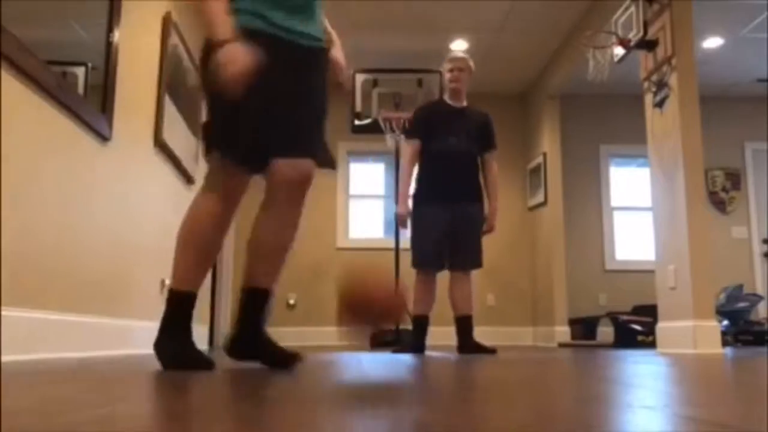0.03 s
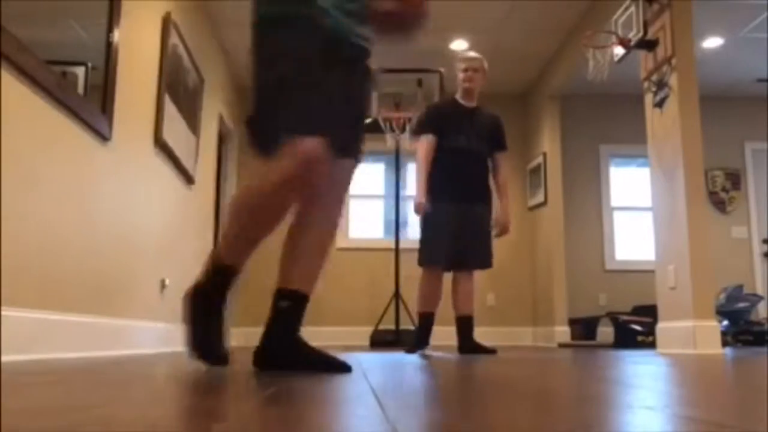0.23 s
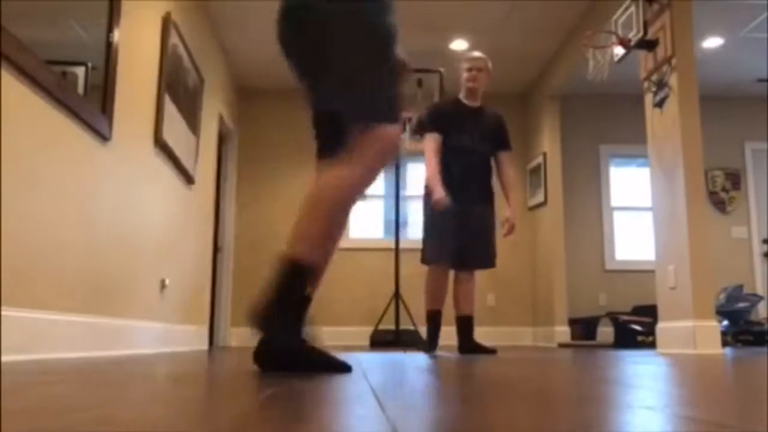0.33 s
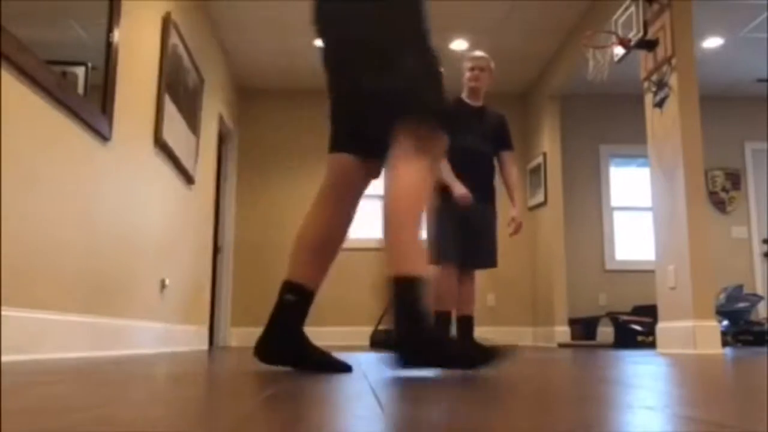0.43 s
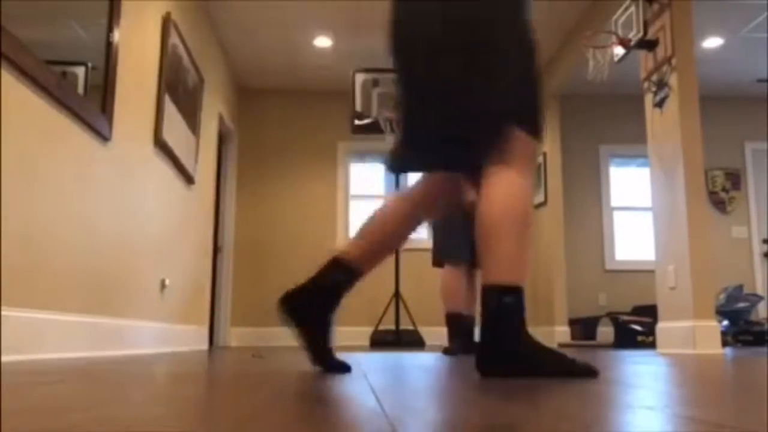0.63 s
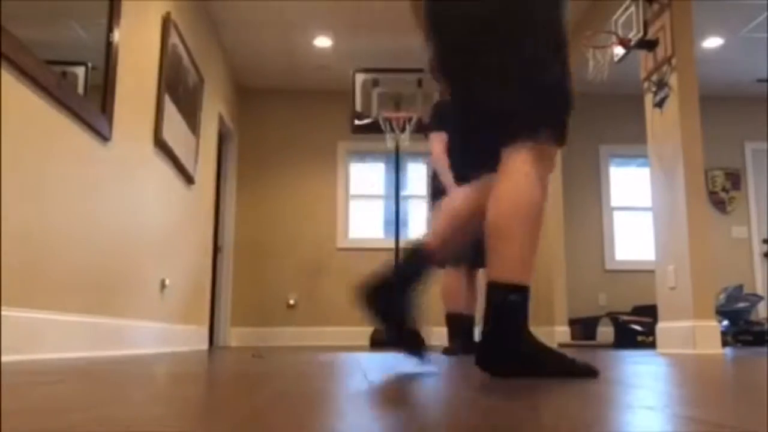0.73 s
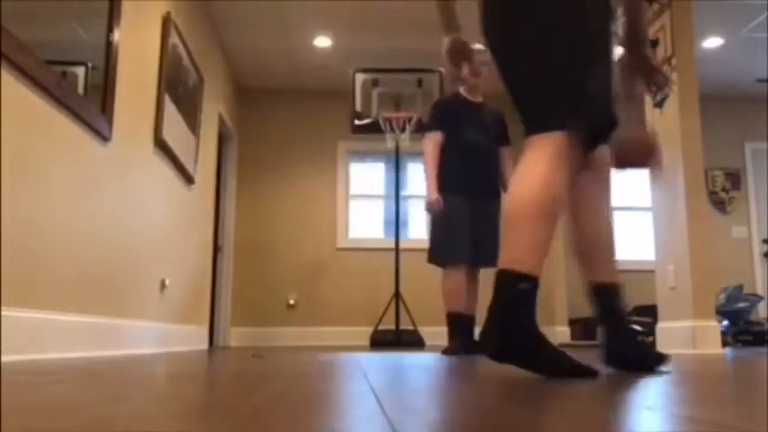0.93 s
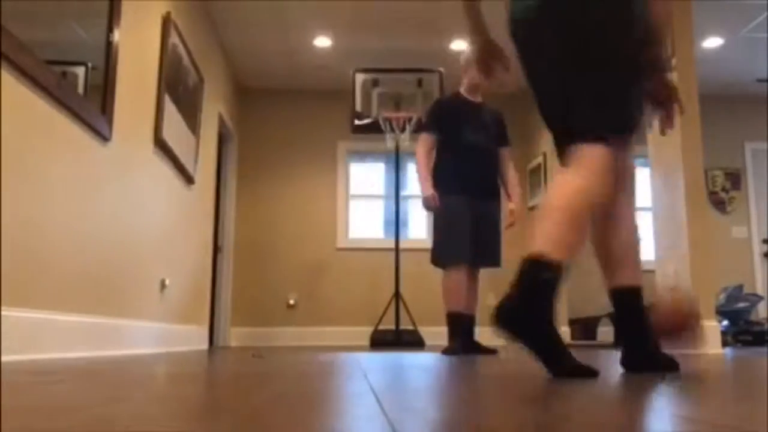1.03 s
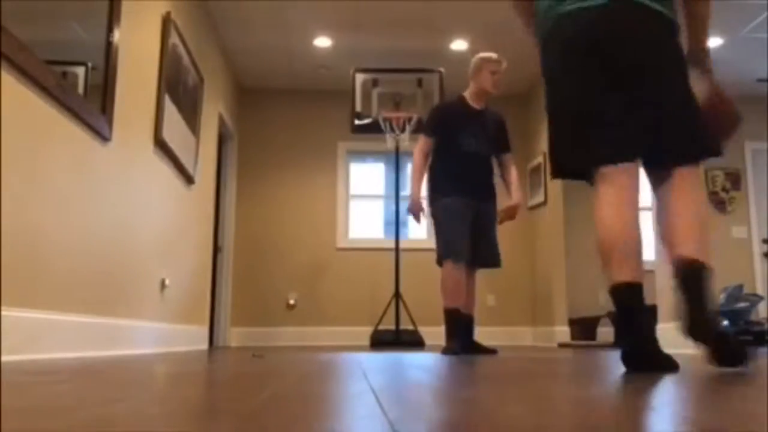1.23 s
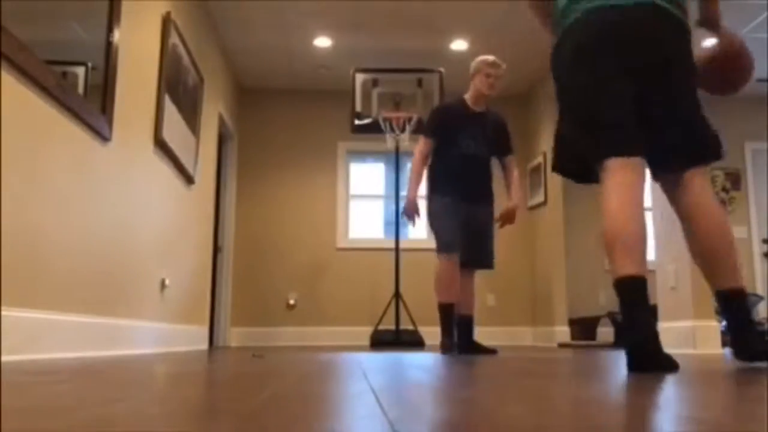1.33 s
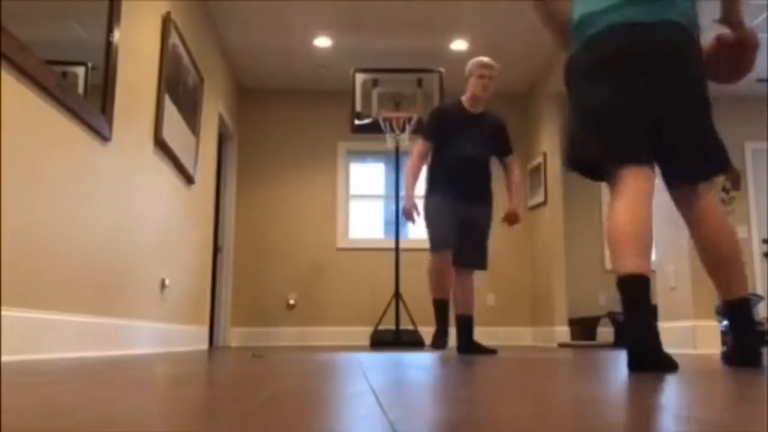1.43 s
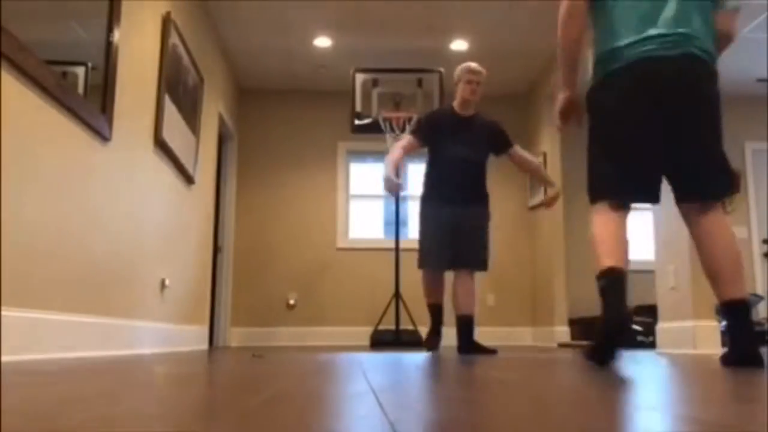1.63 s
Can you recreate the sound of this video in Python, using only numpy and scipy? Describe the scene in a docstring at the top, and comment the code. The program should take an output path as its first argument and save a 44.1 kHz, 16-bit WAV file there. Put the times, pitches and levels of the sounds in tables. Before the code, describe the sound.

A small basketball hits a hardwood floor twice, each a sharp slap with a low boom and hollow ring; soft sock footfalls and a faint hand pat come between, in a bare room, microphone near the floor.

```python
"""Two bounces of a basketball on hardwood

A small basketball is dribbled twice on a hardwood floor in a bare basement room, over a quiet hush.
Each bounce is a swept pulse (slap) with damped sines (boards, air in the ball), answered by echoes,
low bursts and decaying noise. Shaped noise gives hand pats, sock slides, footfalls and a heel tap."""
import sys
import numpy as np
from scipy import signal
from scipy.fft import rfft, irfft, next_fast_len
from scipy.io import wavfile
from scipy.ndimage import map_coordinates

SR = 44100
rng = np.random.default_rng(int(sys.argv[2]) if len(sys.argv) > 2 else 0)


def int16_out(signal):
    """Quantize to a 16-bit WAV file."""
    q = np.round(np.clip(np.atleast_2d(signal).T, -1, 1) * 32767)
    wavfile.write(sys.argv[1], SR, q.astype(np.int16))


N = 74970

# Spectra give relative levels only: noise is scaled to rms 1 and pulses to peak 1.
# Steady hush of the room: [f/Hz, relative level/dB]
HUSH_SPECTRUM = [(25, -22), (70, 2), (160, -2), (400, 2), (1300, -5.5), (3000, -13.5), (8000, -19.5),
                 (15300, -28.5), (16300, -59)]
HUSH_DB = -61.5

# Ringing that is dying away at the start: [f/Hz, level/dB, t60/s]
OLD_RINGING = [(158, -63.5, 0.53), (227, -59, 0.34), (425, -49, 0.17), (1231, -65.5, 0.74)]
WAVER, WAVER_PER_S = 0.54, 15  # final depth of the wavering, random knots per second

# Sock slides: [t/s at the peak, level/dB, Gaussian rise/s, brightness/dB per octave]
SOCK_SLIDES = [(.005, -63, .01, -2), (.055, -70.5, .01, 6), (0.216, -62, 0.024, -0.5),
               (0.758, -58, 0.011, 3), (0.841, -60, 0.03, 1.5), (0.886, -64.5, 0.0082, 4.5),
               (1.147, -51.5, 0.015, -2.5), (1.177, -59.5, 0.026, 2.5), (1.68, -60, 0.019, -3.5)]
# Swish of socks on wood: [f/Hz, relative level/dB]
SOCK_SPECTRUM = [(200, -19), (600, -9), (1150, 6), (2000, 9), (3000, 4.5), (4800, 10), (9000, 2.5),
                 (15300, -3), (16300, -40)]
SOCK_T60_S = 0.24

# Footfalls: [t/s at the peak, level/dB, Gaussian rise/s]
FOOTFALLS = [(.21, -50, 0.028), (.62, -56, 0.025), (.7, -49.5, 0.023), (.757, -46, 0.011),
             (.895, -52, 0.023), (.94, -55, 0.014), (1.68, -56, 0.013)]
# Dull colour of a footfall: [f/Hz, relative level/dB]
FOOTFALL_SPECTRUM = [(25, -17), (70, 0.5), (160, -0.5), (300, -8.5), (600, -20.5), (1500, -24), (4000, -39),
                     (12000, -66)]
FOOTFALL_T60_S = 0.33

# Bounces: [t/s, slap level/dB, slap brightness/dB per octave, boom gain/dB, room gain/dB,
# room brightness/dB per octave, air slope/dB per octave above AIR_HZ]
BOUNCE_EVENTS = [(0.2428, -3, 0.9, -1, -1.5, -0.45, 1), (1.2728, -2.5, -0.04, -2.5, -3, 0.06, -3)]
AIR_HZ = 6000
# Direct slap: [f/Hz, relative level/dB]
SLAP_SPECTRUM = [(100, -23.5), (600, -6), (1100, 2.5), (1800, 5.5), (2800, 1), (4200, 2.5), (7500, -0.5),
                 (10000, -11.5), (15000, -12), (17000, -28.5)]
SLAP_LAG_CYCLES = 1.25  # the contact patch spreads, so the low notes come later

# Each spot of impact wakes the modes differently.
# Floorboards: [f/Hz, t60/s, first-bounce level/dB, second-bounce level/dB], before the boom gain
BOARD_MODES = [(88, 0.27, -14.5, -20.5), (140.04, 0.51, -21, -29.5), (185, 0.41, -21.5, -18),
               (261.7, 0.41, -20.5, -39), (383.3, 0.337, -29, -29.5), (457, 0.481, -30.5, -34.5),
               (599.7, 0.25, -31, -48)]
BOOM_DELAY_S, BOOM_RISE_S = 0.001, 0.012  # the ball squashes before the boards give; time constant
# Air in the ball: [f/Hz, t60/s, first-bounce level/dB, second-bounce level/dB]
BALL_MODES = [(905, .35, -31.5, -49), (1024, 0.24, -30, -67), (1110, 0.26, -32.5, -29),
              (1215, 0.19, -30, -30), (1458, .42, -37.5, -64), (1887, .3, -42, -39.5),
              (2134, .32, -38.5, -44.5), (2880, 0.22, -38, -59.5)]
# High beating pair of the air in the ball: [f/Hz, level/dB, t60/s]
PING_MODES = [(3740, -58, 1.8), (3751, -65, 1.7)]

# Wash of the room: [f/Hz, relative level/dB]
ROOM_SPECTRUM = [(30, -35), (55, -18), (90, -3), (150, -4), (220, -5), (330, -8), (500, -9.5), (760, -20),
                 (1150, -14.5), (1600, -19), (2600, -25), (4000, -24), (6500, -24), (10000, -30.5),
                 (15400, -35.5), (16300, -66)]
# Decay of the wash: [f/Hz, t60/s]
ROOM_DECAY = [(60, 0.46), (170, 0.58), (450, 0.47), (1200, .44), (3000, 0.49), (7000, 0.41), (14000, .27)]
ROOM_DB, ROOM_RISE_S = -20, 0.004  # before each bounce's room gain; time constant
# The ball's many upper modes ripple the colour of the wash.
RIPPLE_DB, RIPPLE_HZ = 2.5, 70.1  # rms of the random knots, knot spacing

# Slap off nearby surfaces: [t/s, level/dB]
SLAP_ECHOES = [(.2453, -25), (.2498, -26), (0.2558, -19), (.2757, -20.5), (0.2773, -32), (1.2763, -2.5),
               (1.2847, -16.5)]
# Colour of those echoes: [f/Hz, relative level/dB]
ECHO_SPECTRUM = [(200, -11), (1200, -12), (2600, -8.5), (4200, 8.5), (7500, -2), (10000, -13.5),
                 (15000, -18.5), (16500, -41)]
SCATTER_DB, SCATTER_T60_S = -23, 0.024  # spray of sound behind each echo, relative to the echo

# Low bursts just after each bounce, the knock of the slap and the boom off the walls:
# [t/s at the peak, level/dB, f/Hz, Gaussian half length/s]
LOW_BURSTS = [(.246, -17.5, 343, 0.0019), (0.2557, -8.5, 130, .0035), (.2545, -21, 588, 0.0026),
              (.262, -17, 86.4, 0.0091), (.298, -11, 139.3, 0.0082), (1.2855, -18, 160, 0.0042),
              (1.295, -13.5, 121, .005), (1.325, -17.5, 130, 0.0061)]

# Hand on the ball: [t/s, level/dB before the onset and decay]
HAND_PATS = [(.443, -41), (1.128, -57), (1.178, -61)]
# Hollow note of the patted ball: [f/Hz, relative level/dB]
PAT_SPECTRUM = [(300, -36), (900, -28), (1100, -1.5), (1210, 2.5), (1400, -22.5), (3000, -32.5),
                (12000, -45)]
PAT_T60_S, PAT_ROOM_DB, PAT_ROOM_T60_S = 0.066, -7, 0.31
CONTACT_RISE_S = 0.001  # time constant of every sudden contact

# A heel meets the floor: [t/s, level/dB before the onset and decay]
HEEL_TAPS = [(.751, -45.5)]
# Colour of the heel tap: [f/Hz, relative level/dB]
HEEL_SPECTRUM = [(150, 2), (450, 0), (900, 10), (2300, -6), (5000, -27), (15000, -12), (16500, -50)]
HEEL_T60_S = 0.029

TOP_HZ = 17000


def amp(db):
    """Level: decibels become an amplitude ratio."""
    return 10 ** (np.asarray(db) / 20)


def along(points, hz):
    """Logarithmic frequency scale: (f/Hz, value) points are interpolated in log frequency."""
    f, v = np.transpose(points)
    return np.interp(np.log(hz + 1), np.log(f + 1), v)


def since(s):
    """Causality: elapsed time in seconds since s, zero before it."""
    return np.maximum(np.arange(N) / SR - s, 0)


def fall(t, t60):
    """Exponential damping: the amplitude falls by 60 dB in t60."""
    return np.exp(-np.log(1000) * t / t60)


def filtered(x, response):
    """Linear filtering: the spectrum of x is multiplied by a response of frequency."""
    size = next_fast_len(N + SR // 2)
    hz = np.fft.rfftfreq(size, 1 / SR)
    return irfft(rfft(x, size) * response(hz), size)[:N]


def noise(spectrum):
    """Spectral shaping: white noise takes a given colour and unit rms."""
    x = filtered(rng.standard_normal(N), lambda hz: amp(along(spectrum, hz)))
    return x / x.std()


def tilted(spectrum, tilt_db):
    """Spectral tilt: a colour is brightened by about tilt_db per octave."""
    return [(hz, db + tilt_db * np.log2((hz + 100) / 1000)) for hz, db in spectrum]


def wobble(rate, size=256):
    """Random modulation: a smooth curve passes through random knots, rate of them a second."""
    return map_coordinates(rng.standard_normal(size), [np.arange(N) * rate / SR], mode="mirror")


def swells(rows, t60):
    """Soft contact: Gaussian rises and exponential decays in the room, added as energies."""
    t = np.arange(N) / SR
    envelopes = []
    for s, db, rise in rows:
        growth = np.exp(-.5 * (np.minimum(t - s, 0) / rise) ** 2)
        envelopes.append(amp(db) * growth * fall(since(s), t60))
    return np.linalg.norm(envelopes, axis=0)


def strikes(rows, t60):
    """Sudden contact: a brief saturating onset is followed by exponential decay."""
    envelope = np.zeros(N)
    for s, db in rows:
        t = since(s)
        envelope += amp(db) * (1 - np.exp(-t / CONTACT_RISE_S)) * fall(t, t60)
    return envelope


def add(track, s, sound):
    """Superposition: a sound is added to the track from time s."""
    part = track[max(round(s * SR), 0):][:len(sound)]
    part += sound[:len(part)]


def hush():
    """Stationary noise: the room keeps a steady, quiet hush."""
    return amp(HUSH_DB) * noise(HUSH_SPECTRUM)


def ring(modes, t):
    """Modal decay: damped sines start at t = 0 and waver more as the room takes over."""
    depth = WAVER * (1 - fall(t, 0.59))
    out = np.zeros(N)
    for hz, db, t60 in modes:
        level = amp(db) * fall(t, t60) * (1 + depth * wobble(WAVER_PER_S))
        phase = 2 * np.pi * hz * t + 2 * depth * wobble(WAVER_PER_S)
        out += level * np.sin(phase)
    return out


def old_ringing():
    """Free decay: modes already sounding at the start die away."""
    return ring(OLD_RINGING, since(0))


def sock_slides():
    """Friction noise: socks swish on wood, each slide with its own brightness."""
    out = np.zeros(N)
    for *swell, tilt_db in SOCK_SLIDES:
        out += noise(tilted(SOCK_SPECTRUM, tilt_db)) * swells([swell], SOCK_T60_S)
    return out


def footfalls():
    """Soft impact noise: dull footfalls swell and die away in the room."""
    return noise(FOOTFALL_SPECTRUM) * swells(FOOTFALLS, FOOTFALL_T60_S)


def click(spectrum, size=2048):
    """Minimum phase plus dispersion: a coloured pulse of peak 1 sweeps quickly downwards."""
    hz = np.fft.rfftfreq(size, 1 / SR)
    # Folding the cepstrum onto positive times gives the minimum-phase pulse.
    cepstrum = irfft(np.log(amp(along(spectrum, hz))))
    cepstrum[1:size // 2] *= 2
    cepstrum[size // 2 + 1:] = 0
    lag = 2 * np.pi * SLAP_LAG_CYCLES * np.log1p(hz / 500)
    pulse = irfft(np.exp(rfft(cepstrum) - 1j * lag))
    return pulse / np.abs(pulse).max()


def boom(bounce, boom_db):
    """Flexural modes: the boards ring after a short delay, with a saturating rise."""
    t = since(BOUNCE_EVENTS[bounce][0] + BOOM_DELAY_S)
    modes = [(hz, levels[bounce], t60) for hz, t60, *levels in BOARD_MODES]
    return amp(boom_db) * ring(modes, t) * (1 - np.exp(-t / BOOM_RISE_S))


def ball_air(bounce):
    """Cavity modes: the air in the ball rings, with a close pair beating at the top."""
    t = since(BOUNCE_EVENTS[bounce][0])
    modes = [(hz, levels[bounce], t60) for hz, t60, *levels in BALL_MODES]
    return ring(modes, t) + ring(PING_MODES, t)


def ripple(hz, size=1024):
    """Modal colouration: random peaks and dips lie above the low modes."""
    bumps = map_coordinates(rng.standard_normal(size), [hz / RIPPLE_HZ], mode="mirror")
    return amp(RIPPLE_DB * bumps * (hz > 1300))


def room(s, tilt_db, air_db):
    """Diffuse reverberation: noise decays at a rate set by frequency, the top treble fastest."""
    wash = filtered(noise(ROOM_SPECTRUM), ripple)
    hz, t, z = signal.stft(wash, SR, nperseg=512)
    hz = hz[:, None]
    brightness_db = tilt_db * np.log2((hz + 100) / 1000)
    treble_db = air_db * np.log2(np.maximum(hz / AIR_HZ, 1))
    decay = fall(np.maximum(t - s, 0), along(ROOM_DECAY, hz))
    tail = signal.istft(z * amp(brightness_db + treble_db) * decay, SR)[1][:N]
    return amp(ROOM_DB) * tail * (1 - np.exp(-since(s) / ROOM_RISE_S))


def bounces():
    """Impact excitation: each bounce slaps and sets boards, ball and room sounding."""
    out = np.zeros(N)
    for bounce, (s, slap_db, slap_tilt_db, boom_db, room_db, tilt_db, air_db) in enumerate(BOUNCE_EVENTS):
        add(out, s, amp(slap_db) * click(tilted(SLAP_SPECTRUM, slap_tilt_db)))
        out += boom(bounce, boom_db)
        out += ball_air(bounce)
        out += amp(room_db) * room(s, tilt_db, air_db)
    return out


def echoes():
    """Early reflection and scattering: thinner slaps return, each trailing a spray of noise."""
    out, echo = np.zeros(N), click(ECHO_SPECTRUM)
    for s, db in SLAP_ECHOES:
        add(out, s, amp(db) * echo)
    spray = noise(ECHO_SPECTRUM) * strikes(SLAP_ECHOES, SCATTER_T60_S)
    return out + amp(SCATTER_DB) * spray


def low_bursts():
    """Gaussian tone bursts: the knock of the slap and the boom off the walls follow each bounce."""
    out = np.zeros(N)
    for s, db, hz, half in LOW_BURSTS:
        t = np.arange(N) / SR - s
        out += amp(db) * np.exp(-.5 * (t / half) ** 2) * np.sin(2 * np.pi * hz * t)
    return out


def pats():
    """Cavity resonance: the palm briefly wakes the ball's hollow note, which lingers in the room."""
    direct = strikes(HAND_PATS, PAT_T60_S)
    lingering = amp(PAT_ROOM_DB) * strikes(HAND_PATS, PAT_ROOM_T60_S)
    return noise(PAT_SPECTRUM) * (direct + lingering)


def heel_tap():
    """Impact noise: a heel meets the floor in a short coloured burst."""
    return noise(HEEL_SPECTRUM) * strikes(HEEL_TAPS, HEEL_T60_S)


def scene():
    """Superposition: ball, hand and feet sound over the hush of the room."""
    ball = old_ringing() + bounces() + echoes() + low_bursts() + pats()
    feet = sock_slides() + footfalls() + heel_tap()
    return (hush() + ball + feet)[None]


def record(dry):
    """Band limitation: nothing is kept at or above TOP_HZ."""
    return filtered(dry[0], lambda hz: hz < TOP_HZ)[None]


dry = scene()
out = record(dry)
int16_out(out)
```